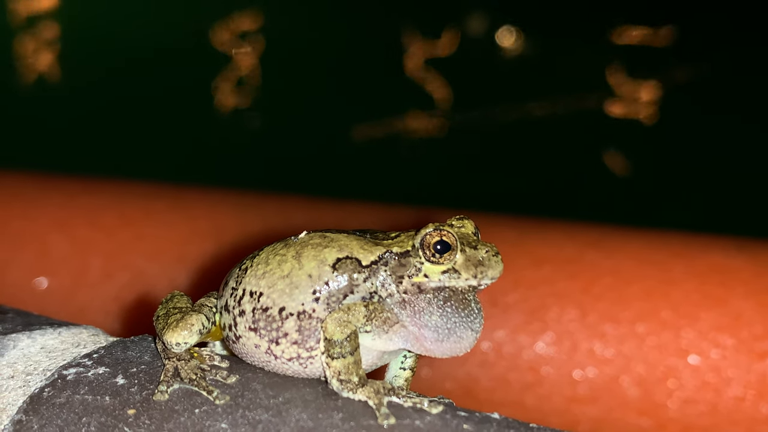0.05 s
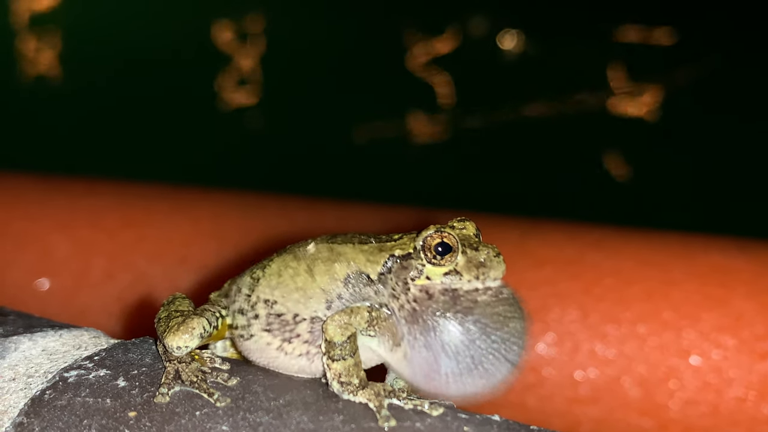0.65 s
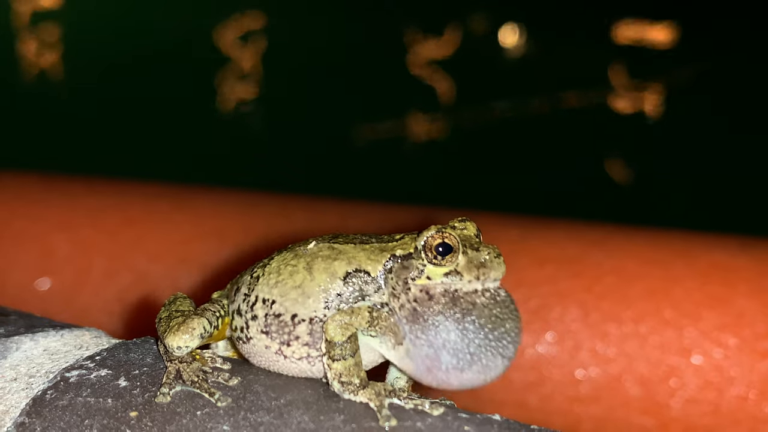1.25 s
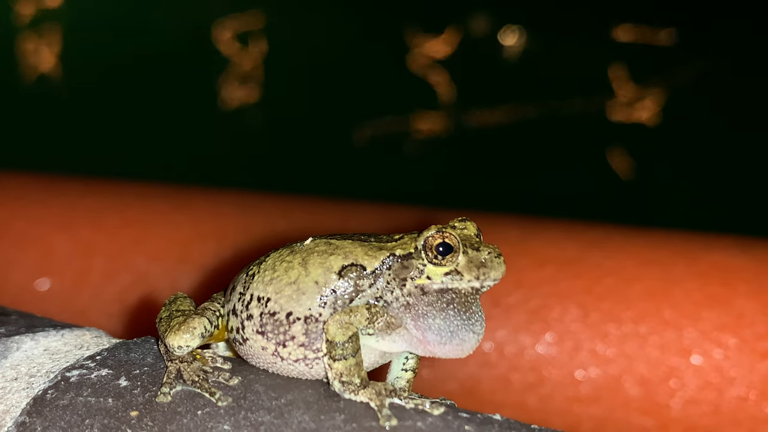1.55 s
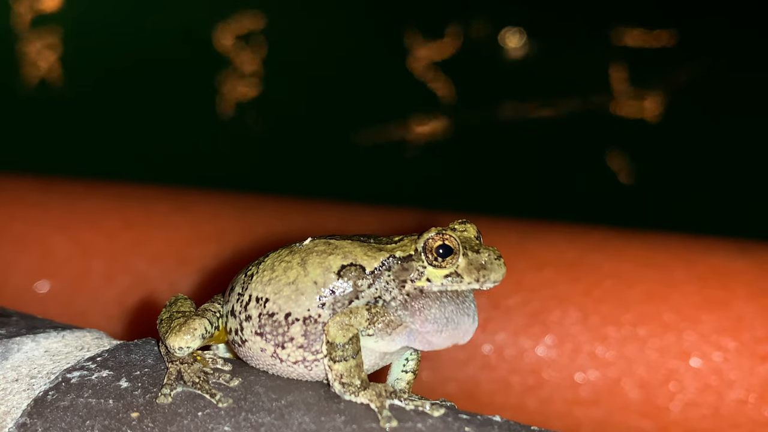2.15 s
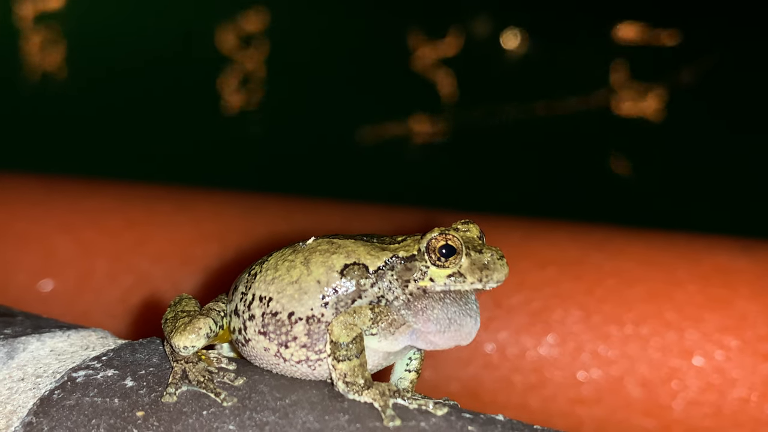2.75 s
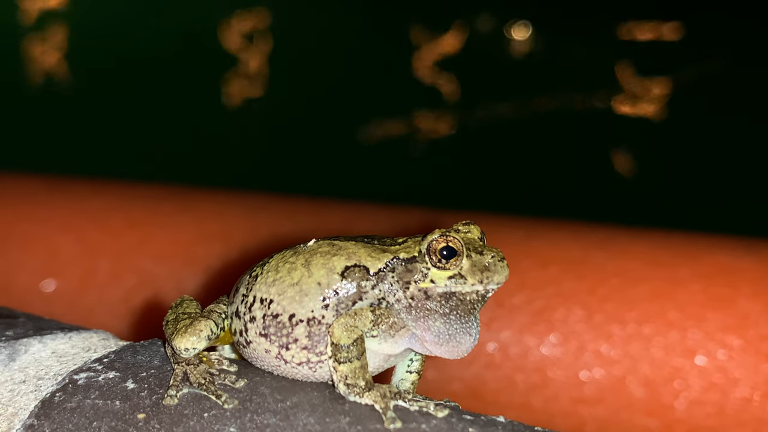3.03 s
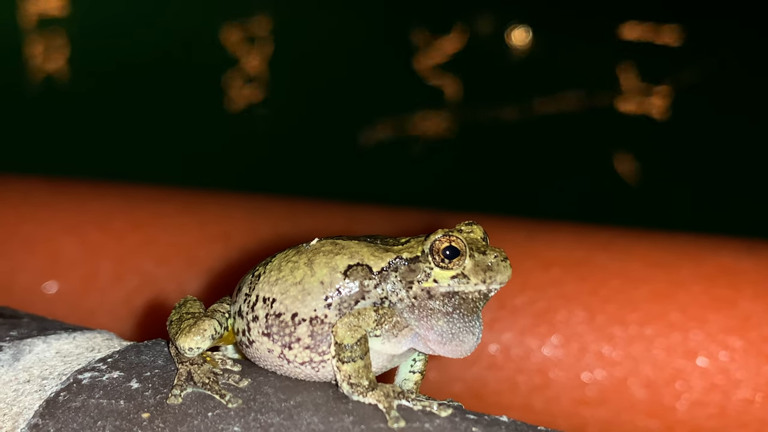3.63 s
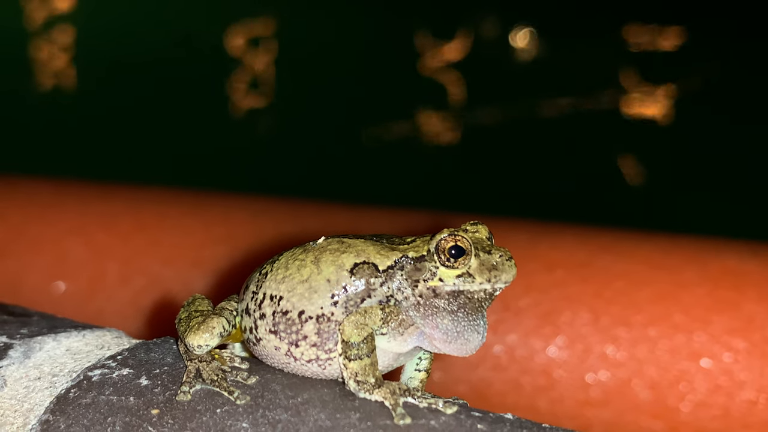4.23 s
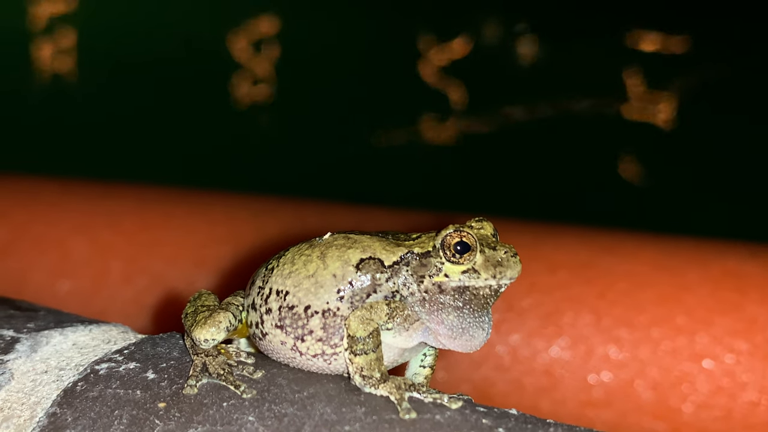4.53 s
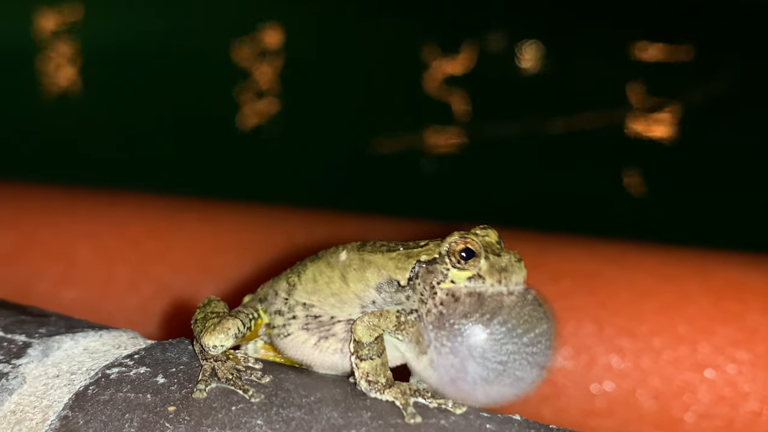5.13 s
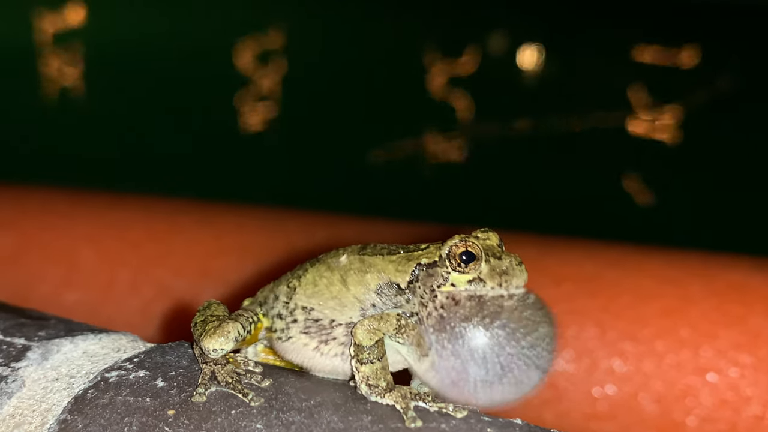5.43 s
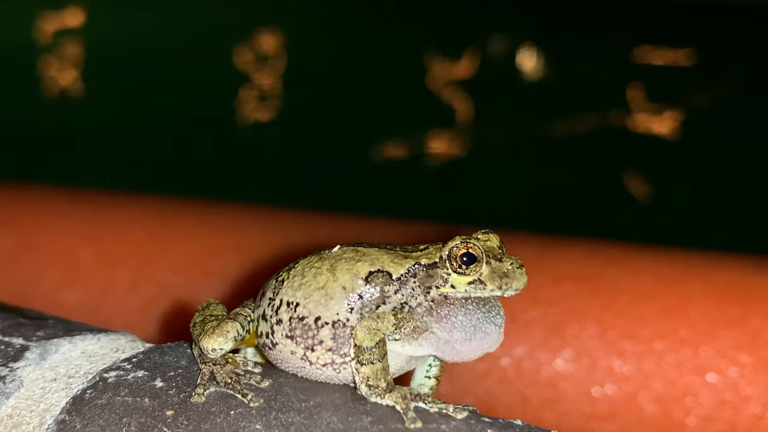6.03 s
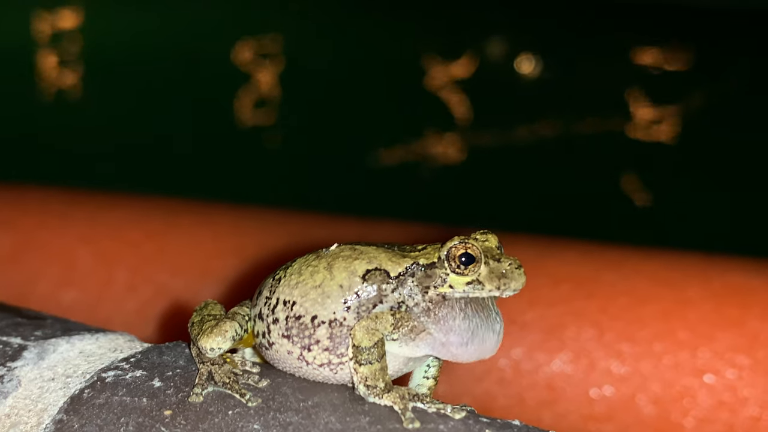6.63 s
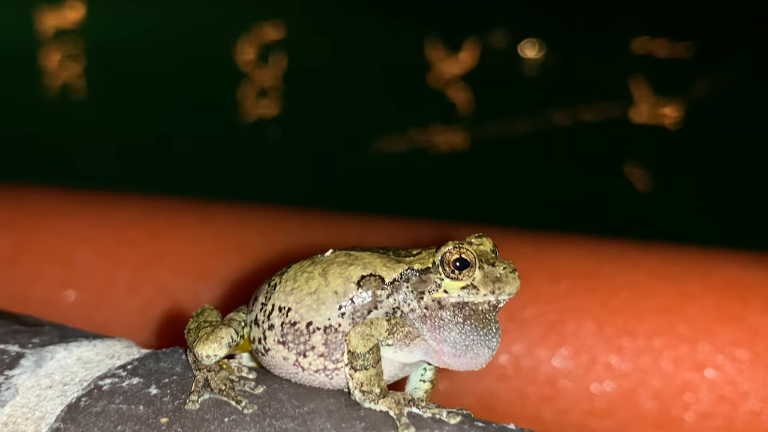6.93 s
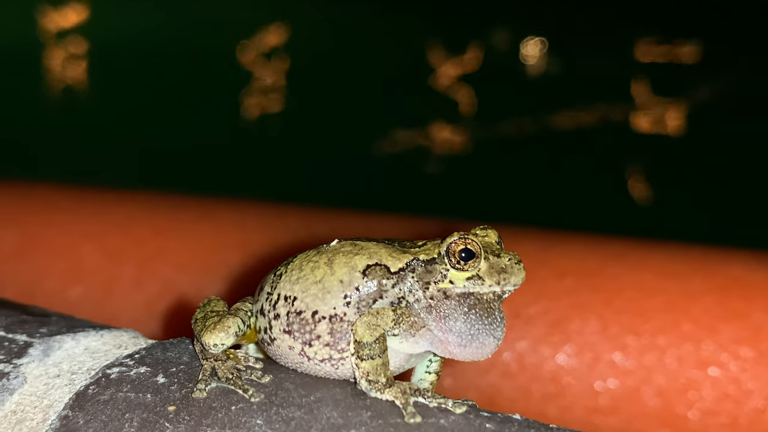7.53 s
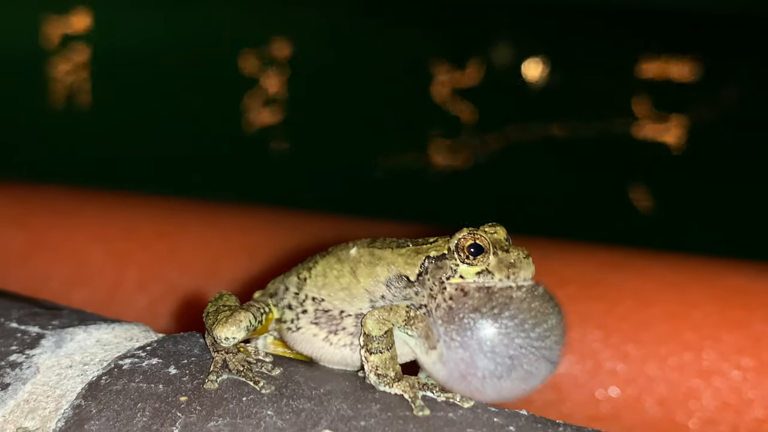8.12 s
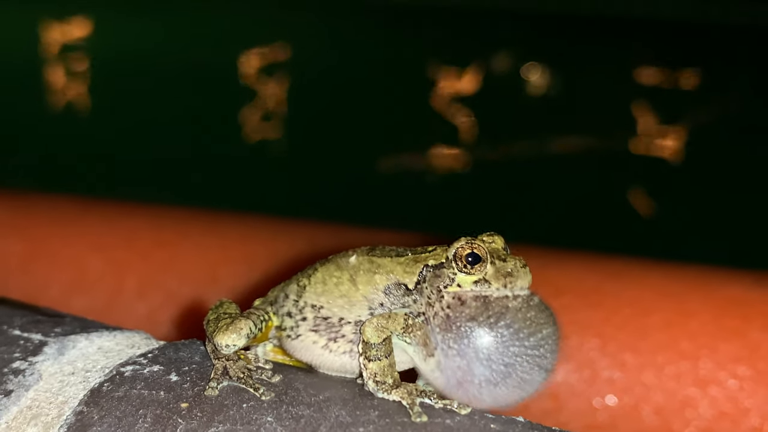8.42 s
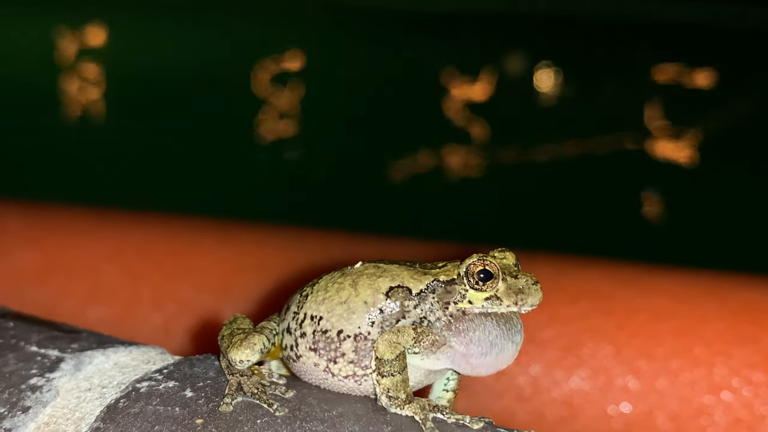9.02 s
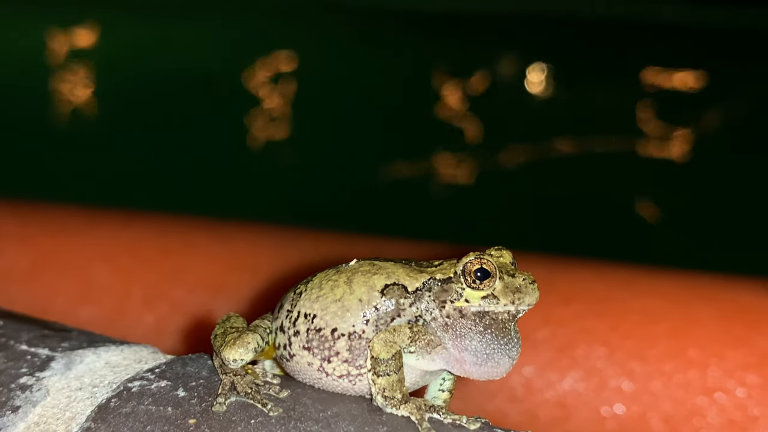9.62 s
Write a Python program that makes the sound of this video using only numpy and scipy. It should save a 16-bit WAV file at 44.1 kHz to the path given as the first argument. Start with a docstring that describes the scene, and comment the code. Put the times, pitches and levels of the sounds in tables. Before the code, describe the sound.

A tree frog gives three loud, pulsing trills close by, while fainter frogs answer around it in the night.

```python
"""A walled yard at night: a gray tree frog trills three times close by; neighbours and far frogs answer.
Each trill is a train of short rising chirps whose second harmonic sweeps through the resonance of the
vocal sac. Walls echo the calls over a faint distant chorus, a low rumble and a soft hiss.
Gain control ducks everything under the near frog and holds."""
import sys
import numpy as np
from scipy import signal
from scipy.fft import rfft, irfft, next_fast_len
from scipy.io import wavfile
from scipy.ndimage import uniform_filter1d, minimum_filter1d

SR = 44100
rng = np.random.default_rng(int(sys.argv[2]) if len(sys.argv) > 2 else 0)


def unload_audio(sound):
    """Save the sound as a 16-bit wav file, at the path given as the first command line argument."""
    columns = np.transpose(np.atleast_2d(sound))
    # keep every value between -1 and 1, then stretch to whole-number steps
    steps = np.round(np.clip(columns, -1, 1) * 32767)
    wavfile.write(sys.argv[1], SR, steps.astype(np.int16))


N = 435266
FFT_SIZE = next_fast_len(N, real=True)

# Spectra radiated by throat and vocal sac. Each row: frequency in Hz, gain in dB.
NEAR_VOICE = [(940, -29.5), (1140, -16.5), (1330, -13), (1590, -7), (1890, -25.5), (2240, -10.5),
              (2570, -3), (2910, -4.5), (3620, -50.5), (4100, -28), (6350, -48), (9250, -37), (10050, -28),
              (11250, -75.5)]
BRIGHT_VOICE = [(920, -8), (1130, -10.5), (1500, -10.5), (1900, -13), (2250, -13), (2500, 2), (2900, 2.5),
                (3400, -30.5), (4080, -16.5), (4600, -42.5), (7200, -50), (9600, -25.5), (11500, -55),
                (15000, -57)]
DULL_VOICE = [(950, -9), (1200, -17.5), (1500, -12), (1900, -29), (2250, -9), (2500, 0), (2900, -8),
              (3400, -36.5), (3830, -22), (4300, -37), (7000, -49), (8600, -36.5), (10500, -58.5),
              (15000, -65.5)]
MUFFLED_VOICE = [(1000, -27), (1400, 10), (1900, -27), (2650, 0.5), (3400, -20), (7000, -51), (8700, -14),
                 (10500, -63)]
# Frogs by name. Each entry: voice, pulse length ratio, left lead in s, left minus right in dB for
# harmonics 1 and 2, bounce delay per channel in s, gains of bounce, scatter and yard tail in dB.
CALLERS = { "near": dict(voice=NEAR_VOICE, length=.95, lead_s=.000275, low_pan_db=8.5, pan_db=.8, bounce_s=(.0052, .0043),
           bounce_db=-17, scatter_db=-18, yard_db=-33),
           "left": dict(voice=BRIGHT_VOICE, length=.8, lead_s=.00044, low_pan_db=-1, pan_db=.6, bounce_s=(.0019, .0032),
           bounce_db=-10, scatter_db=-10.5, yard_db=-23),
           "right": dict(voice=DULL_VOICE, length=.92, lead_s=.00045, low_pan_db=-.2, pan_db=-2.5, bounce_s=(.0061, .0014),
           bounce_db=-24, scatter_db=-9, yard_db=-19),
           "behind": dict(voice=DULL_VOICE, length=1, lead_s=.00044, low_pan_db=3, pan_db=-1, bounce_s=(.0046, .0028),
           bounce_db=-19.5, scatter_db=-9, yard_db=-12),
           "hidden": dict(voice=MUFFLED_VOICE, length=.8, lead_s=.00043, low_pan_db=0, pan_db=0, bounce_s=(.007, .005),
           bounce_db=-8, scatter_db=-6, yard_db=-10),
           "deep": dict(voice=DULL_VOICE, length=1, lead_s=.00044, low_pan_db=0, pan_db=0, bounce_s=(.009, .007),
           bounce_db=-8, scatter_db=0, yard_db=-1),
           "far": dict(voice=DULL_VOICE, length=.97, lead_s=.00043, low_pan_db=.9, pan_db=.8, bounce_s=(.0082, .0088),
           bounce_db=-7, scatter_db=1, yard_db=1.5)}


def undb(db):
    """Decibels to gain."""
    return 10 ** (np.asarray(db) / 20)


def colour(points, hz):
    """Gain of a (Hz, dB) spectrum at the given frequencies."""
    points_hz, db = np.transpose(points)
    return undb(np.interp(np.log(np.maximum(hz, 1)), np.log(points_hz), db))


def drift(rate_hz, size):
    """Smooth random drift about zero."""
    step = int(SR / rate_hz)
    stairs = np.repeat(rng.standard_normal(size // step + 1), step)
    return 0.75 * uniform_filter1d(stairs, step)[:size]


def delay(x, delay_s):
    """The sound, arriving later."""
    return np.pad(x, (int(delay_s * SR), 0))[:N]


def add(track, sound, start):
    """Mix a stereo sound into the track from a sample on."""
    lo, hi = max(start, 0), min(start + sound.shape[1], N)
    if hi > lo:
        track[:, lo:hi] += sound[:, lo - start:hi - start]


def chirp(caller, pitch, weak_db, whistles, jitter=.0081, rasp=.71, sac_follow=.36, buzz_onset_db=31):
    """One pulse: the cords tighten and their harmonics glide through the sac's resonance."""
    # Each row: time from the peak in s, fundamental in Hz, drive of the cords in dB.
    sweep = [(-.014, 1030, -27), (-.01, 1105, -6), (-.005, 1197, -1), (0, 1281, 0), (.002, 1335, -1),
             (.004, 1530, -7), (.0075, 1620, -30)]
    sweep_s, sweep_hz, drive_db = np.transpose(sweep)
    t = np.arange(-720, 720) / SR
    sweep_time = t / caller["length"]
    # Weak pulses are shorter, and their slack cords sit lower.
    age = sweep_time * np.exp(.027 * weak_db)
    detune = 1 - .0019 * weak_db + jitter * drift(1500, len(t))
    f0_hz = pitch * np.interp(sweep_time, sweep_s, sweep_hz) * detune
    drive = undb(np.interp(age, sweep_s, drive_db)) * (age > sweep_s[0]) * (age < sweep_s[-1])
    k = np.arange(1, 13)[:, None]
    sac = colour(caller["voice"], k * f0_hz / pitch ** sac_follow)  # smaller frog, higher sac
    buzz = drive ** .86 * (1 + rasp * drift(2200, len(t)))
    # A slack sac weakens harmonic 2 more than 1; the faintest pulses lose their buzz.
    loss_db = weak_db * np.select([k == 1, k == 2], [.19, 1], (weak_db / buzz_onset_db) ** 2)
    harmonics = sac * np.where(k > 2, buzz, drive) * undb(-loss_db)
    pan_db = np.select([k == 1, k == 2], [caller["low_pan_db"], caller["pan_db"]], 0)
    # Low harmonics reach the left first; the treble is slightly scattered in phase.
    lead_rad = np.where(k <= 4, np.pi * f0_hz * caller["lead_s"], .56 * rng.standard_normal(k.shape) / k)
    phase = 2 * np.pi * (np.cumsum(f0_hz) / SR + rng.random())
    pulse = np.zeros((2, len(t)))
    for channel, side in zip(pulse, (1, -1)):
        waves = np.sin(k * (phase + side * lead_rad))
        channel += np.sum(harmonics * undb(side * pan_db / 2) * waves, axis=0)
    for peak_hz, fall_hz_per_s, whistle_db in whistles:
        glide_hz = (peak_hz - fall_hz_per_s * t) * (1 + .013 * drift(1500, len(t)))
        whistle_phase = 2 * np.pi * (np.cumsum(glide_hz) / SR + rng.random((2, 1)))
        pulse += undb(whistle_db - weak_db) * drive * np.sin(whistle_phase)
    return pulse


def pulse_times(first_s, last_s, rate_hz, slowing_per_s):
    """Pulses at a mean rate, slowing steadily through the trill."""
    length_s = last_s - first_s
    even_s = np.linspace(0, length_s, round(length_s * rate_hz) + 1)
    return first_s + even_s - slowing_per_s * even_s * (length_s - even_s)


def trills(name, swell_pulses=1.47, swell_shape=1.24, spread_db=.65, waver=.006):
    """All calls of one frog: each swells over its first pulses and slows towards its end."""
    # Each row: first pulse in s, last pulse in s, gain in dB, pitch ratio, caller.
    calls = [ (-.55, .07, -18, .97, "left"), (-.42, .119, -20, .99, "behind"), (.12, .42, -44, 1, "far"),
             (.47, .97, -37, .9, "deep"), (.632, 1.27, .2, 1.012, "near"), (1.595, 2.383, -16, 1, "right"),
             (2.4, 2.7, -40, 1.01, "far"), (2.74, 3.33, -33.5, .9, "deep"),
             (2.829, 3.367, -22.5, .975, "behind"), (3.358, 3.863, -17.5, .975, "left"),
             (3.94, 4.45, -36, 1, "far"), (4.14, 4.77, -37.5, 1.03, "far"),
             (4.859, 5.553, -1.1, 1.01, "near"), (4.997, 5.787, -18, 1, "right"),
             (6.15, 6.68, -35.5, .99, "far"), (6.45, 6.9, -41, .98, "far"), (6.92, 7.48, -34, .9, "deep"),
             (6.991, 7.498, -18, .955, "left"), (7.05, 7.59, -39, 1.01, "far"),
             (7.812, 8.3, -42, 1.02, "hidden"), (7.994, 8.501, -2.2, 1.01, "near"),
             (8.3, 8.74, -35.5, 1.01, "far"), (8.95, 9.5, -35.5, .98, "far"),
             (9.32, 9.9, -35.5, .9, "deep"), (9.461, 10.25, -19.5, .985, "right")]
    # Each caller: pulse rate in Hz, slowing per s, weakness of the first pulse in dB.
    habits = { "near": (33.1, .081, 33), "left": (35.5, .12, 17), "right": (33, .057, 20),
              "behind": (29.7, .097, 22), "hidden": (30.7, .08, 16), "deep": (32, .07, 13.4),
              "far": (31, 0.078, 8.6)}
    # Near frog's thin whistles. Each row: frequency at the pulse peak in Hz, fall in Hz/s, gain in dB.
    whistles = [(12970, 8900, -37.5), (15550, 150000, -41.5)]
    rate_hz, slowing_per_s, first_weak_db = habits[name]
    track = np.zeros((2, N))
    for first_s, last_s, gain_db, pitch, who in calls:
        if who != name:
            continue
        for i, at_s in enumerate(pulse_times(first_s, last_s, rate_hz, slowing_per_s)):
            weak_db = first_weak_db * np.exp(-(i / swell_pulses) ** swell_shape)
            pulse_pitch = pitch * rng.normal(1, waver)
            pulse = chirp(CALLERS[name], pulse_pitch, weak_db, whistles if name == "near" else [])
            add(track, pulse * undb(rng.normal(gain_db, spread_db)), int(at_s * SR) - pulse.shape[1] // 2)
    return track


def echoes(x, t60_s, gap_s):
    """Dense decaying reflections, unrelated left and right."""
    t = np.arange(int(t60_s * SR)) / SR
    response = rng.standard_normal((2, len(t))) * np.exp(-np.log(1000) * t / t60_s)
    response /= np.sqrt(np.sum(response ** 2, axis=1, keepdims=True))
    return signal.oaconvolve(delay(x, gap_s)[None], response, axes=1)[:, :N]


def frog(name):
    """A caller in its place: direct sound, one bounce, nearby scatter and the yard's tail."""
    caller, direct = CALLERS[name], trills(name)
    bounce = np.array([delay(channel, s) for channel, s in zip(direct, caller["bounce_s"])])
    scatter = undb(caller["scatter_db"]) * echoes(direct[0], t60_s=.09, gap_s=.004)
    yard = undb(caller["yard_db"]) * echoes(direct[0], t60_s=.6, gap_s=.025)
    return direct + undb(caller["bounce_db"]) * bounce + scatter + yard


def chorus(level_db=-63.5, centre_hz=2520, width_hz=190, throb_db=3):
    """Very distant frogs blur into a throbbing band at the pitch of their sacs."""
    hz = np.arange(FFT_SIZE // 2 + 1) * SR / FFT_SIZE
    resonance = np.exp(-.5 * ((hz - centre_hz) / width_hz) ** 2)
    band = irfft(rfft(rng.standard_normal((2, FFT_SIZE))) * resonance)[:, :N]
    return band / np.std(band) * undb(level_db + throb_db * drift(60, N))


def rumble_gain(lift_width_s=.21, flutter_db=3):
    """The rumble flutters, rises briefly and settles lower."""
    # Each row: time in s, gain in dB.
    course = [(0, 1.5), (4.9, 1.5), (6.1, -3.5), (9.87, -2.5)]
    # Each row: centre in s, lift in dB. The lift near 8.8 s brings the rumble back early from the ducking.
    lifts = [(1.9, 3), (3.2, 5), (8.82, 9.5)]
    t = np.arange(N) / SR
    course_db = np.interp(t, *np.transpose(course))
    lift_db = sum(db * np.exp(-((t - at_s) / lift_width_s) ** 2) for at_s, db in lifts)
    return undb(course_db + lift_db + flutter_db * drift(19, N))


def night_air(gain_db=-50, wide_hz=560, rumble_hz=440):
    """A restless low rumble, alike in both channels, under a smooth wide hiss."""
    # Each row: frequency in Hz, relative noise density in dB.
    spectrum = [(25, -14), (55, 5), (100, -2), (170, -3.5), (300, -9.5), (600, -20.5), (1000, -21.5),
                (2000, -27.5), (4000, -32.5), (7000, -40.5), (9500, -35.5), (11500, -52.5), (13500, -36.5),
                (16000, -65)]
    hz = np.arange(FFT_SIZE // 2 + 1) * SR / FFT_SIZE
    mid, side = rfft(rng.standard_normal((2, FFT_SIZE))) * colour(spectrum, hz)
    width = np.clip(hz / wide_hz, .17, 1)
    stereo = np.array([mid + width * side, mid - width * side])
    lowpass = 1 / (1 + (hz / rumble_hz) ** 2)
    rumble = irfft(stereo * lowpass)[:, :N] * rumble_gain()
    hiss = irfft(stereo * (1 - lowpass))[:, :N]
    return (rumble + hiss) * undb(gain_db) / np.std(irfft(mid))


def scene():
    """Frogs near and far in the night air."""
    return sum(frog(name) for name in CALLERS) + chorus() + night_air()


def gain_control(x, limit_db=-9, hold_s=.58, slew_s=.08):
    """Loud peaks turn the gain down; it holds, then comes back."""
    level_db = 20 * np.log10(np.abs(x).mean(axis=0) + 1e-9)
    gain_db = np.minimum(0, limit_db - level_db)
    hold, slew = int(hold_s * SR), int(slew_s * SR)
    held_db = minimum_filter1d(gain_db, hold, origin=(hold - 1) // 2, mode="constant")
    return x * undb(uniform_filter1d(held_db, slew, origin=(slew - 1) // 2, mode="constant"))


def record(dry):
    """Gain control, then a steep treble cut."""
    cutoff_hz = 15800
    lowpass = signal.ellip(10, .2, 80, cutoff_hz, fs=SR, output="sos")
    return signal.sosfilt(lowpass, gain_control(dry))


dry = scene()
out = record(dry)
unload_audio(out)
```